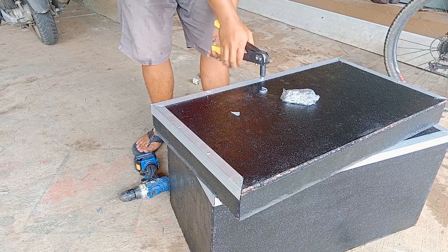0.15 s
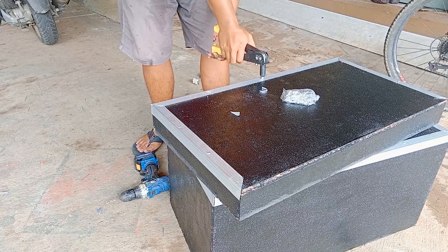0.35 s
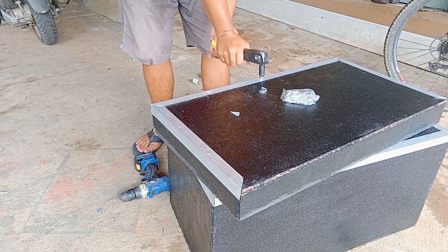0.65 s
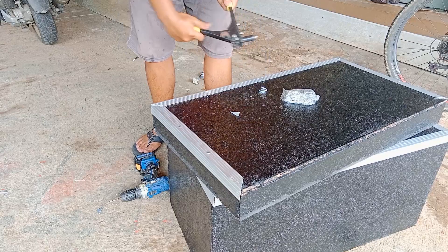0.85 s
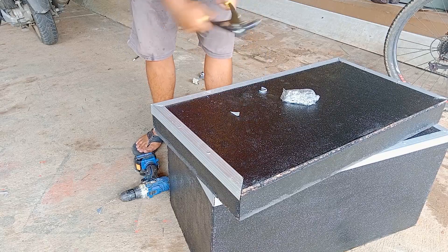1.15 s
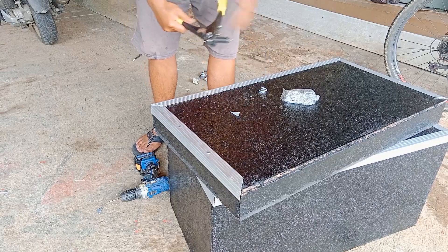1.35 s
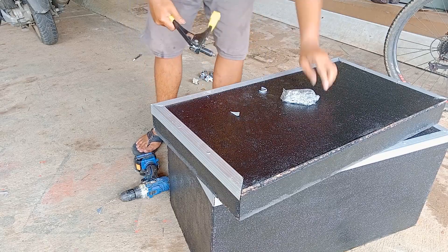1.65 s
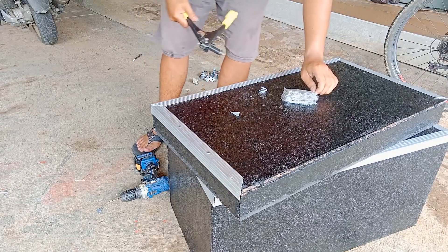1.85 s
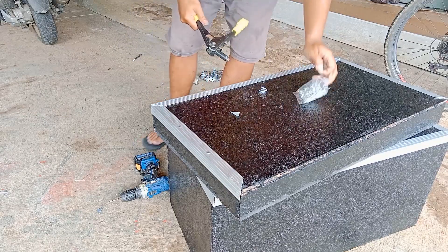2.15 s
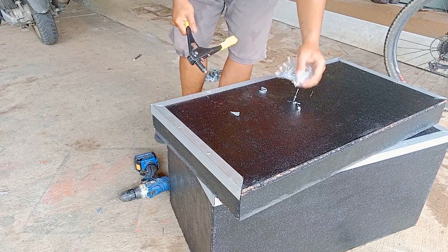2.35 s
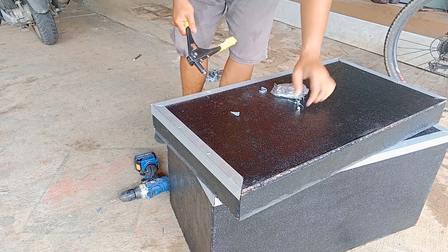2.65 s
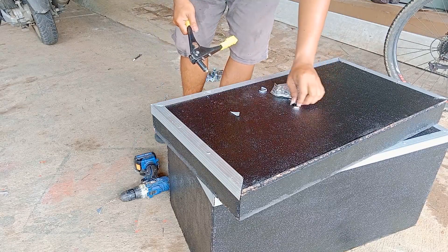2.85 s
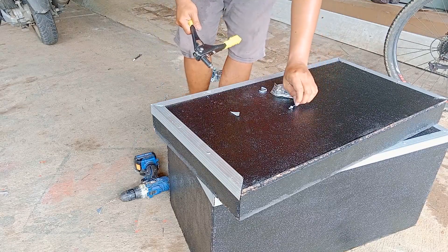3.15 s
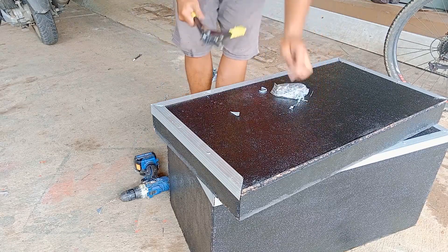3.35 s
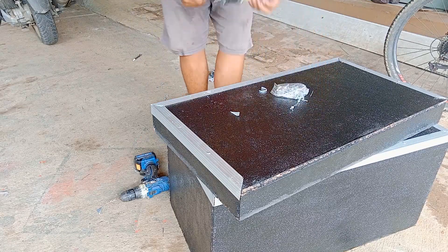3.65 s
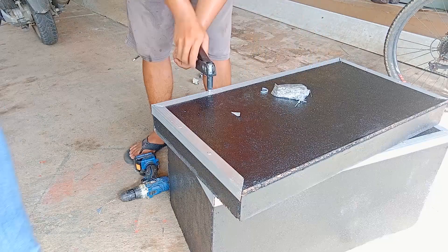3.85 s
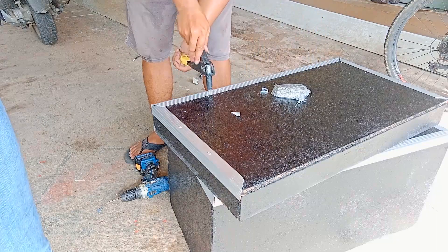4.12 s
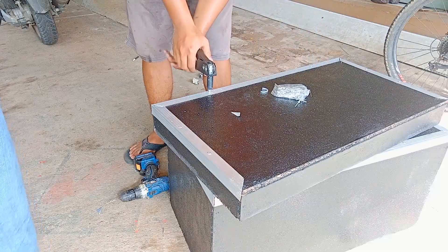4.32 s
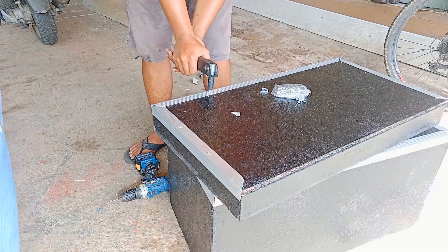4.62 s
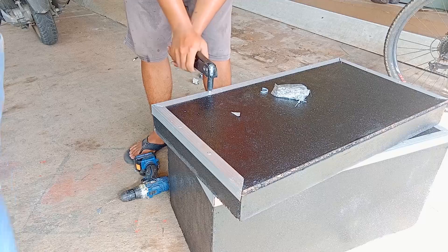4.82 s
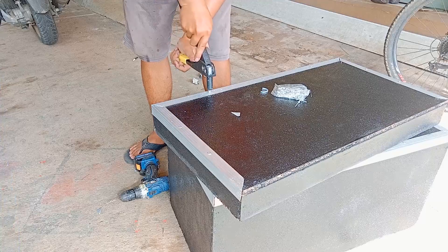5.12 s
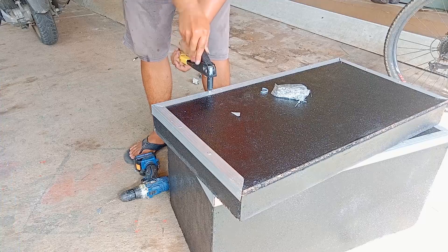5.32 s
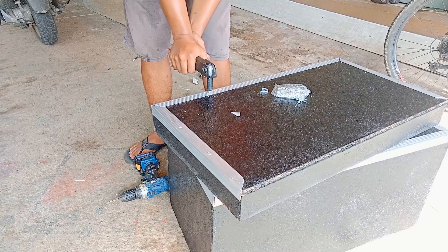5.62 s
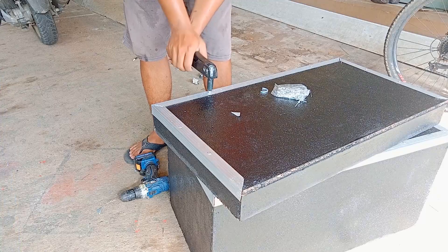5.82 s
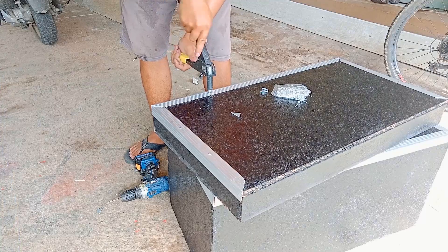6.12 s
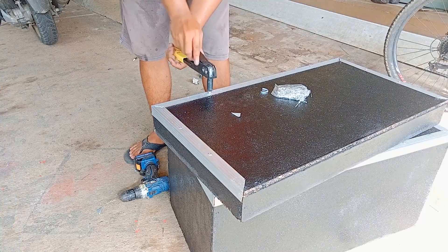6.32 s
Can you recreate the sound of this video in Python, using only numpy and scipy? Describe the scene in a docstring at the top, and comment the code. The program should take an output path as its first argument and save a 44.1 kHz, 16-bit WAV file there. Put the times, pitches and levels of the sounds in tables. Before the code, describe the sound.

A hand riveter taps the hollow lid of a metal-trimmed case, then its steel handles clack loudly in a quick cluster with gritty slides. Lighter ticks, soft rubs and boomy knocks follow as small parts are moved on the lid. Near the end a squeezed rivet grinds in a short swelling burst, then one hard clack. Hard-floored workshop, one microphone, faint air.

```python
"""Hand riveter on the hollow lid of a metal-trimmed case in a hard-floored workshop, one microphone.
Blows ring the lid's modes and rubs slip over it through most of the take, from the very start.
Steel clacks and gritty slides cluster at 0.8-1.35 s as the riveter is worked; lighter ticks and clacks follow.
Near 6 s the squeezed lever grinds the rivet in swelling jerks, and a last steel clack comes soon after.
Short squeaks, handling rustle, still air and dense echoes lie around all this."""
import sys
import numpy as np
from scipy import signal
from scipy.io import wavfile
from scipy.ndimage import uniform_filter1d

SR = 44100
rng = np.random.default_rng(int(sys.argv[2]) if len(sys.argv) > 2 else 0)


def dump(signal):
    """Clip the signal to [-1, 1] and save it as 16-bit WAV at the path in sys.argv[1]."""
    limited = np.clip(np.atleast_2d(signal).T, -1, 1)
    pcm = np.round(limited * 32767).astype(np.int16)
    wavfile.write(sys.argv[1], SR, pcm)


N = 285479

# Modes of the steel riveter: f/Hz, level/dB, t60/s
STEEL_MODES = [(1325, -6, .1), (2140, -3, .12), (2390, -7, .12), (2752, -5, .14), (2864, -5, .2),
               (3012, -8, .14), (3250, -8, .1), (3550, -6, .14), (3900, -9, .1)]
# Modes of the hollow lid: f/Hz, level/dB, t60/s
LID_MODES = [(140.6, -9.5, 0.37), (235.4, 3, .11), (264.7, -1.5, 0.12), (294, -3, 0.075), (389, -6, 0.23),
             (443.1, -11.5, 0.7), (559, -4.5, 0.19), (614, -38, 0.18), (689.5, -5, 0.066),
             (756.6, -2.5, 0.097), (1016, -13, 0.37), (1077, -28, 0.28), (1235, -8, 0.055),
             (1538, -15, 0.089)]
# Colour of the lid's dense upper modes: f/Hz, level per Hz/dB
PANEL_COLOUR = [(40, -41), (80, -3), (140, 7.5), (280, 3.5), (500, 7), (760, -2.5), (1100, 0.5),
                (1700, -6.5), (3400, -22), (5000, -21), (6500, -32.5), (8300, -13.5), (11000, -46.5),
                (15000, -34)]


def riveter(clack_db=-10, body_db=-4, edge_db=-17.5, hollow_db=-2, hollow_t60=0.065):
    """Jaws and handles hit their stops; the hollow body rings at a pitch set by the grip."""
    # Steel parts meeting: t/s, relative level/dB, body re level/dB, hollow pitch f/Hz
    clacks = [(0.347, -23.5, -10, 1200), (0.8326, -6.5, -9.5, 958), (1.2088, -7.5, -7, 1053),
              (1.2821, -8, -8, 1250), (1.309, -9, -9, 1350), (1.3273, -13, -5, 1117),
              (1.8967, -22, -10, 1097), (1.922, -26.5, -2.5, 1406), (3.3028, -17, -14, 727),
              (3.688, -15, -10, 1240), (4.2746, -27.5, -6, 1554), (4.7721, -17, -2, 1590),
              (5.001, -26.5, -22, 1320), (5.0565, -6, -14, 886), (5.279, -20, -19.5, 1530),
              (6.325, -7, -13, 1286), (6.4644, -22, -21, 1090)]
    edge_per_body = -0.24  # dB per dB: the more body a clack has, the duller its edge
    out = np.zeros(N)
    t = np.arange(SR // 3) / SR
    for s, db, body, hollow_hz in clacks:
        lead_s, blow = snap(t, graze_s=0.0029, crack_t60=0.04, ring_t60=0.053, ring_db=0.0, modes_db=-14)
        sound = amp(clack_db) * attack_level(band(blow, 2140, 3530))
        sound += amp(body + body_db) * attack_level(band(blow, 620, 1330))
        sound += amp(edge_per_body * body + edge_db) * attack_level(band(blow, 6650, 20400))
        add(out, s - lead_s, amp(db) * sound)
        hollow = np.sin(2 * np.pi * hollow_hz * t) * amp(-60 * t / hollow_t60)
        add(out, s, amp(db + body + hollow_db) * attack_level(hollow))
    return out


def squeeze(crest_s=6.075, hold_s=0.075, lid_db=-3.5):
    """The rivet grinds under the lever; the same jerks shake the lid that holds it."""
    # Colour of the grinding rivet: f/Hz, level per Hz/dB
    grind_colour = [(290, -30), (500, -15), (629, -4.5), (696, -5.5), (954, -9.5), (1470, -2), (1800, -6.5),
                    (1960, -5.5), (2930, -5.5), (5920, -20.5), (8360, -13.5), (10800, -31), (15500, -31)]
    # The lid's voice while the rivet is dragged: f/Hz, level per Hz/dB
    groan_colour = [(53, -49), (90, -20), (118, -22), (195, -3.5), (265, -3), (344, -21), (398, -1.5),
                    (512, -15.5), (631, -14.5), (694, 2.5), (950, -31), (1100, -16), (1430, -30),
                    (2420, -120)]
    t = np.arange(N) / SR
    before_crest = np.maximum(crest_s - t, 0)
    after_hold = np.maximum(t - crest_s - hold_s, 0)
    # builds at 106 dB/s from its start, lets go at 293 dB/s
    force = (t > 5.86) * amp(-22 - 106 * before_crest - 293 * after_hold)
    jerks = slips(per_s=2200, spread_db=3.8)
    jerks = jerks * catching(depth_db=1.5, lo_hz=39.6, hi_hz=157)
    grind = evened(colour(jerks, grind_colour))
    groan = evened(colour(jerks, groan_colour))
    return force * (grind + amp(lid_db) * groan)


def slides(slide_db=-1, ring_db=-16):
    """Gritty jerks of steel sliding in the jaws and of fainter handling scrapes; the tool rings faintly."""
    # Gritty scrapes, in the jaws or fainter, such as the packet: start t/s, length/s, relative level/dB
    slide_rows = [(0.302, 0.046, -44.5), (0.348, 0.14, -43), (0.64, 0.041, -39), (0.838, 0.045, -26),
                  (1.137, 0.06, -42.5), (1.196, 0.015, -24), (1.209, 0.06, -18.5), (1.263, 0.14, -21),
                  (1.812, 0.07, -47), (1.9, 0.03, -34), (3.688, 0.16, -32.5), (4.19, 0.068, -49.5),
                  (5.03, 0.013, -32.5), (5.19, 0.17, -43.5), (5.41, 0.15, -48), (6.2, 0.095, -36)]
    # Colour of the sliding friction: f/Hz, level per Hz/dB
    slide_colour = [(300, -48), (700, -9), (1050, 15.5), (1350, 5), (1700, 6.5), (2300, 10.5), (3400, 5.5),
                    (5000, -1), (7000, -8.5), (8400, -2.5), (11500, -23.5), (14500, -15)]
    jerks = slips(per_s=1700, spread_db=3.8)
    tool = ringing(STEEL_MODES, np.arange(SR // 3) / SR, spread_db=1)
    ring = signal.oaconvolve(jerks, tool)[:N]
    sound = evened(colour(jerks, slide_colour)) + amp(ring_db) * evened(ring)
    motion = strokes(slide_rows, attack_s=0.0026, sag_db_per_s=65, release_db_per_s=257)
    return amp(slide_db) * sound * motion * catching(depth_db=3, lo_hz=60, hi_hz=294)


def ticks(tick_db=-12, edge_db=-1):
    """Light touches of rivet and jaws: short cracks with little ring."""
    # Ticks: t/s, relative level/dB, edge re level/dB
    tick_rows = [(0.487, -21, -8.5), (0.9323, -16, -8), (1.792, -33, -20), (2.281, -24, -12.5),
                 (2.4982, -24, -11), (2.7564, -43.5, -4.5), (2.826, -26.5, -15), (2.851, -28.5, -1),
                 (3.1109, -35, -15), (3.275, -25, -16), (3.575, -26.5, -1), (3.688, -23, -13),
                 (3.864, -28, -8), (3.969, -28.5, -17), (4.319, -35, -19), (4.4078, -25, -16.5),
                 (4.59, -28.5, -12.5), (4.9524, -44.5, -2), (5.0253, -20, -10.5), (5.868, -32.5, -7.5),
                 (6.2696, -18.5, -12.5)]
    out = np.zeros(N)
    t = np.arange(SR // 5) / SR
    for s, db, edge in tick_rows:
        lead_s, blow = snap(t, graze_s=.0006, crack_t60=0.016, ring_t60=0.023, ring_db=-17.5, modes_db=-28)
        sound = amp(tick_db) * attack_level(band(blow, 890, 6600))
        sound += amp(edge + edge_db) * attack_level(band(blow, 4900, 13900))
        add(out, s - lead_s, amp(db) * sound)
    return out


def lid(boom_db=1, trim_db=0, tick_db=-17):
    """Each blow rings the panel's low modes, its dense upper modes and the metal trim."""
    # Blows on the lid: t/s, relative level/dB, boom re level/dB, rattle of the trim re level/dB
    knocks = [(0.002, -15, 4.5, -5.5), (0.18, -31.5, -6, -5), (0.487, -30, 0.5, -2.5),
              (0.636, -35.5, -5, -3), (0.685, -26.5, -4.5, -9), (0.752, -25.5, -19, -10),
              (0.934, -12, 1.5, -12), (0.979, -30, -6, -4.5), (1.614, -36, -8, -3.5),
              (1.646, -29, -2, -6.5), (1.695, -29.5, -2.5, -18), (2.102, -39, -16, -8),
              (2.158, -40.5, -12, -4), (2.281, -26, 0, -4.5), (2.506, -28.5, -6.5, -12),
              (2.591, -22, -5, -12.5), (2.851, -16, 1, -6.5), (3.123, -33, -0.5, -6), (3.302, -29, 0, 3.5),
              (3.506, -21, -1.5, -3.5), (3.548, -24, -20, -10), (3.575, -11.5, 2, -8.5),
              (3.812, -29.5, -18, -6), (3.839, -29, -1.5, -6), (3.885, -26, -4, -13),
              (3.992, -28, -2.5, -8), (4.334, -42.5, 8, 3), (4.617, -19, -10.5, -7.5),
              (4.633, -29, -9, 0.5), (4.771, -13, -12, -6.5), (4.777, -19, -24, -24)]
    # Decay of the dense upper modes: f/Hz, t60/s
    panel_decay = [(120, 0.23), (300, 0.22), (800, 0.11), (2500, 0.086), (8000, 0.027)]
    # mid-lid blows boom, give way slowly and ring low; blows near the rim are hard and ring high
    rim_boom_db, middle_boom_db = -5.5, 1.25
    rim_hz, middle_hz = 750, 419
    out = np.zeros(N)
    t = np.arange(SR // 2) / SR
    for s, db, boom, trim in knocks:
        middle = np.interp(boom, [rim_boom_db, middle_boom_db], [0, 1])  # 0 at the rim, 1 mid-lid
        spot_hz = rim_hz + middle * (middle_hz - rim_hz)
        lead = grazing(0.003 * amp(min(boom, 0)))
        upper = dying(rng.standard_normal(len(t)), panel_decay)
        dense = colour(np.r_[lead, upper], PANEL_COLOUR)
        struck_modes = lid_modes(spot_hz, spot_db=7.5, drum_db=8.5 * middle)
        modes = np.r_[0 * lead, ringing(struck_modes, t, spread_db=1.5)]
        modes = attack_level(modes)
        blow = attack_level(dense) + modes
        # in the bass the few modes stand out: they count twice
        sound = amp(boom + boom_db) * attack_level(band(blow + modes, 102, 347))
        sound += attack_level(band(blow, 497, 993))
        sound += amp(trim + trim_db) * attack_level(band(dense, 1773, 4520))
        sound += amp(trim + tick_db) * attack_level(band(dense, 6100, 15400))
        add(out, s - len(lead) / SR, amp(db) * sound)
    return out


def rubs(rub_db=-6, modes_db=-2):
    """Hand, packet and tool dragged over the lid slip in small jerks, heard through its modes."""
    # Rubs on the lid: start t/s, length/s, relative level/dB
    rub_rows = [(0.672, 0.12, -26), (1.652, 0.045, -22.5), (2.06, 0.041, -31), (2.487, 0.11, -24),
                (2.82, 0.027, -25.5), (3.125, 0.24, -31), (3.465, 0.034, -27), (3.8, 0.12, -19),
                (3.93, 0.046, -21.5), (4.543, 0.089, -29), (4.62, 0.06, -18), (5.22, 0.3, -47)]
    jerks = slips(per_s=810, spread_db=-3)
    panel = ringing(LID_MODES, np.arange(SR // 2) / SR, spread_db=4)
    ring = signal.oaconvolve(jerks, panel)[:N]
    friction = band(colour(jerks, PANEL_COLOUR), 61, 1900)
    sound = evened(friction) + amp(modes_db) * evened(ring)
    motion = strokes(rub_rows, attack_s=0.017, sag_db_per_s=12.5, release_db_per_s=453)
    return amp(rub_db) * evened(sound) * motion


def squeaks(waver=0.051, rough=0.13):
    """Brief unsteady tones where dry steel or the lid's skin sticks and slips regularly."""
    # Squeaks: t/s, length/s, pitch f/Hz, level/dB
    squeak_rows = [(0.748, 0.046, 575, -28), (0.885, 0.028, 8540, -35), (0.888, 0.024, 13800, -39),
                   (1.455, 0.025, 736, -34.5), (2.571, 0.039, 700, -28.5), (3.771, 0.066, 7750, -43),
                   (4.228, 0.049, 838, -45), (5.219, 0.036, 7200, -48.5), (5.467, 0.013, 1384, -43),
                   (5.478, 0.045, 3020, -50.5)]
    out = np.zeros(N)
    for s, length, hz, db in squeak_rows:
        unsteady = evened(uniform_filter1d(rng.standard_normal((2, SR // 4)), size=60))
        wander, grip = unsteady[:, :int(length * SR)]
        phase = 2 * np.pi * np.cumsum(hz * (1 + waver * wander)) / SR
        tone = (1 + rough * grip) * np.sin(phase)
        add(out, s, amp(db) * evened(tone * signal.windows.hann(len(tone))))
    return out


def room(x, first_s=0.0018, build_s=0.0062, turns_per_s=0.884, count=3):
    """Dense echoes from floor and walls; random echo patterns take turns, so no fixed tones stand out."""
    # Decay of the echoes: f/Hz, t60/s
    room_decay = [(120, 0.96), (400, 0.32), (1000, 0.27), (3000, 0.32), (8000, 0.23), (15000, 0.36)]
    # Strength of the echoes: f/Hz, level/dB
    room_colour = [(100, -7.5), (250, -4.5), (500, -2.5), (1500, 0.5), (4000, 2), (9000, 1.5),
                   (15000, -0.5)]
    t = np.arange(SR * 2 // 3) / SR
    out = np.zeros(N)
    for k in range(count):
        build = np.clip((t - first_s) / build_s, 0, 1)
        tail = dying(rng.standard_normal(len(t)), room_decay) * build
        # the patterns fade over steadily; their summed power stays even
        turn = np.pi * (turns_per_s * np.arange(N) / SR + k / count)
        share = np.sqrt(2 / count) * np.cos(turn)
        out += signal.oaconvolve(x * share, tail / np.linalg.norm(tail))[:N]
    return colour(out, room_colour)


def background(air_db=-58, rustle_db=5.5, uneven_db=2):
    """Still workshop air as coloured noise, and the soft, uneven rustle of handling as tiny slips."""
    # Colour of the air: f/Hz, level per Hz/dB
    air_colour = [(15, -55), (25, -31), (75, -1), (122, 13), (399, -12), (433, -14), (567, -33), (895, -3),
                  (1050, -14), (2770, -3), (4040, -11), (4380, -8), (5580, -52), (8130, -28), (15500, -33)]
    # Handling noise between the blows: t/s, relative level/dB
    rustle_rows = [(0.0, -42.5), (0.47, -50), (0.79, -51.5), (1.21, -48), (1.78, -51.5), (2.03, -54.5),
                   (3.71, -52.5), (4.11, -54.5), (4.52, -55), (6.47, -62.5)]
    # Colour of the handling noise: f/Hz, level per Hz/dB
    rustle_colour = [(44, -15.5), (75, 9.5), (239, 0), (382, -6), (546, -3), (834, -5.5), (1020, -8.5),
                     (1950, -14), (3330, -18.5), (6350, -37.5), (8300, -29), (10100, -46.5), (15500, -42)]
    air = amp(air_db) * evened(colour(rng.standard_normal(N), air_colour))
    swell = evened(band(rng.standard_normal(N), 4, 20))
    jerks = slips(per_s=2000, spread_db=-1.0)
    rustle = evened(band(colour(jerks, rustle_colour), 80, 18000))
    return air + amp(rustle_db + uneven_db * swell) * level(rustle_rows) * rustle


def snap(t, graze_s, crack_t60, ring_t60, ring_db, modes_db):
    """Steel on steel: a graze, a crack with small rebounds, then the tool's ring; gives (lead s, sound)."""
    # Colour of the steel's dense upper modes: f/Hz, level per Hz/dB
    steel_colour = [(240, -56), (400, -70), (605, -15), (1050, -10.5), (1340, -15), (1470, -3), (2090, 1.5),
                    (2630, 0), (2840, 10), (3250, 5), (3970, -3), (5070, -16.5), (8530, -21.5),
                    (12100, -33), (15500, -28.5)]
    lead = grazing(graze_s)
    rebounds = amp(9.6 * evened(uniform_filter1d(rng.standard_normal(len(t)), size=120)))
    shape = amp(-60 * t / crack_t60) + rebounds * amp(ring_db - 60 * t / ring_t60)
    dense = colour(np.r_[lead, shape * rng.standard_normal(len(t))], steel_colour)
    modes = np.r_[0 * lead, ringing(STEEL_MODES, t, spread_db=3)]
    return len(lead) / SR, attack_level(dense) + amp(modes_db) * attack_level(modes)


def grazing(graze_s, size=1323):
    """The surfaces scrape with force rising exponentially (time constant graze_s) until they meet."""
    before = np.arange(size, 0, -1) / SR
    return rng.standard_normal(size) * np.exp(-before / max(graze_s, 1e-4))


def lid_modes(spot_hz, spot_db, drum_db, reach=0.097, drum_hz=298):
    """The struck spot favours the modes near its own pitch; mid-lid blows also lift the drum-like modes."""
    hz, db, t60 = np.transpose(LID_MODES)
    centres = np.c_[[spot_hz, drum_hz]]
    near_spot, near_drum = np.exp(-(np.log(hz / centres) / reach) ** 2)
    return np.c_[hz, db + spot_db * near_spot + drum_db * near_drum, t60]


def ringing(modes, t, spread_db):
    """Damped modes of alternating sign; random heights vary the ring a little from draw to draw."""
    hz, db, t60 = np.transpose(modes)[:, :, None]
    height = amp(db + spread_db * rng.standard_normal(hz.shape))
    height[::2] *= -1
    return (height * amp(-60 * t / t60) * np.sin(2 * np.pi * hz * t)).sum(0)


def slips(per_s, spread_db):
    """Stick and slip: tiny jerks at random moments; a few stand out, larger (spread > 0) or smaller (< 0)."""
    size = amp(spread_db * np.minimum(rng.exponential(1, N), 4))
    happens = rng.random(N) < per_s / SR
    return size * rng.choice([-1, 1], N) * happens


def catching(depth_db, lo_hz, hi_hz):
    """Dry surfaces catch and give way unevenly: a random gain of mean power 1."""
    return evened(amp(depth_db * evened(band(rng.standard_normal(N), lo_hz, hi_hz))))


def strokes(rows, attack_s, sag_db_per_s, release_db_per_s):
    """Each stroke takes hold quickly, weakens as it goes and dies away after its length."""
    out = np.zeros(N)
    t = np.arange(SR) / SR
    for s, length, db in rows:
        past_end = np.maximum(t - length, 0)
        fall = amp(db - sag_db_per_s * t - release_db_per_s * past_end)
        add(out, s, np.minimum(t / attack_s, 1) * fall)
    return out


def amp(db):
    """Decibels to gain."""
    return 10 ** (np.asarray(db) / 20)


def evened(x):
    """Scales to rms 1."""
    return x / np.sqrt(np.mean(x ** 2) + 1e-20)


def attack_level(x, size=700):
    """Scales a blow to rms 1 over its loudest stretch of size samples."""
    return x / np.sqrt(uniform_filter1d(x ** 2, size).max() + 1e-20)


def level(rows):
    """A curve of (t/s, level/dB) as a gain, silent outside its span."""
    s, db = np.transpose(rows)[:2]
    return amp(np.interp(np.arange(N) / SR, s, db, left=-200, right=-200))


def read(points, hz):
    """Reads a table on a log-frequency axis."""
    f, value = np.transpose(points)
    return np.interp(np.log(hz + 1), np.log(f + 1), value)


def add(mix, s, sound):
    """Mixes a sound in at time s; what falls outside is dropped."""
    start = round(s * SR)
    sound = sound[max(-start, 0):]
    part = mix[max(start, 0):][:len(sound)]
    part += sound[:len(part)]


def band(x, lo_hz, hi_hz):
    """Gentle band-pass."""
    edges = [lo_hz, min(hi_hz, SR / 2 - 1)]
    return signal.sosfilt(signal.butter(2, edges, "band", fs=SR, output="sos"), x)


def colour(x, points, size=4096):
    """Causal minimum-phase filter with the given spectrum, so that attacks stay sharp."""
    log_gain = np.log(amp(read(points, abs(np.fft.fftfreq(size, 1 / SR)))))
    spectrum = np.exp(np.conj(signal.hilbert(log_gain)))
    taps = np.fft.ifft(spectrum).real[:size // 2]
    return signal.oaconvolve(x, taps)[:len(x)]


def dying(x, decay):
    """Lets each band of x die at its own speed."""
    hz, t, z = signal.stft(x, SR, nperseg=128)
    t60 = np.maximum(read(decay, hz), 1e-3)[:, None]
    return signal.istft(z * amp(-60 * t / t60), SR, nperseg=128)[1][:len(x)]


def scene(lid_room_db=-6, steel_room_db=-3):
    """Lid and tool, their echoes and the still air, at one microphone."""
    steel = riveter() + squeeze() + slides() + ticks() + squeaks()
    case = lid() + rubs()
    echoes = room(amp(lid_room_db) * case + amp(steel_room_db) * steel)
    return (case + steel + echoes + background())[None]


def record(dry):
    """The loudest peaks are rounded off below 0.95; then a steep low-pass sets the band limit."""
    rounded = dry / (1 + (dry / .95) ** 4) ** .25
    low_pass = signal.firwin(511, 15650, window=("kaiser", 9), fs=SR)  # cutoff in Hz
    return signal.oaconvolve(rounded, low_pass[None], "same")


dry = scene()
out = record(dry)
dump(out)
```